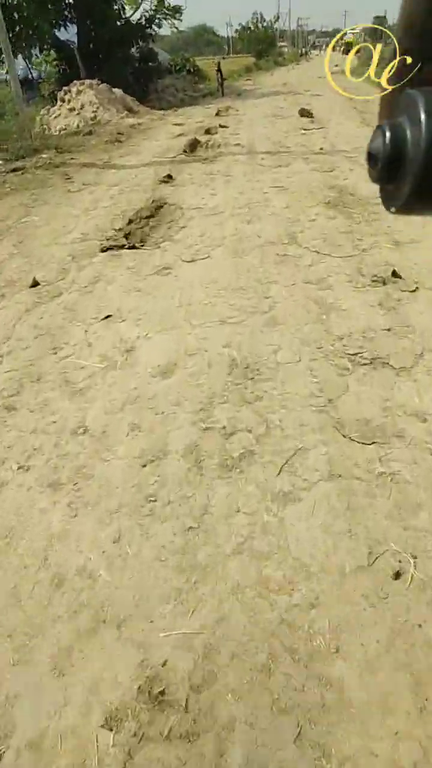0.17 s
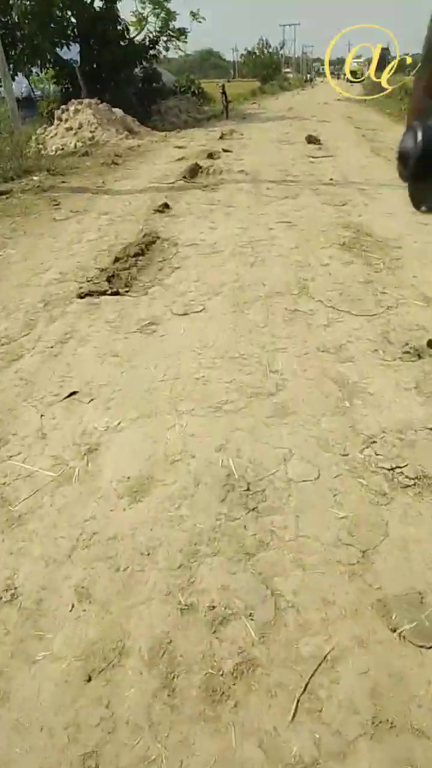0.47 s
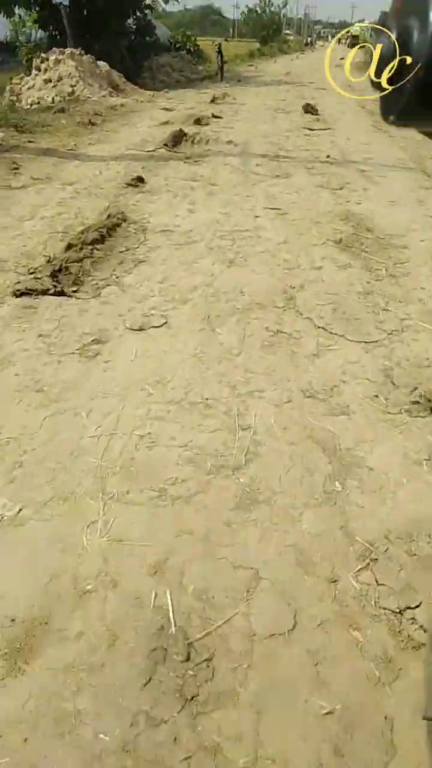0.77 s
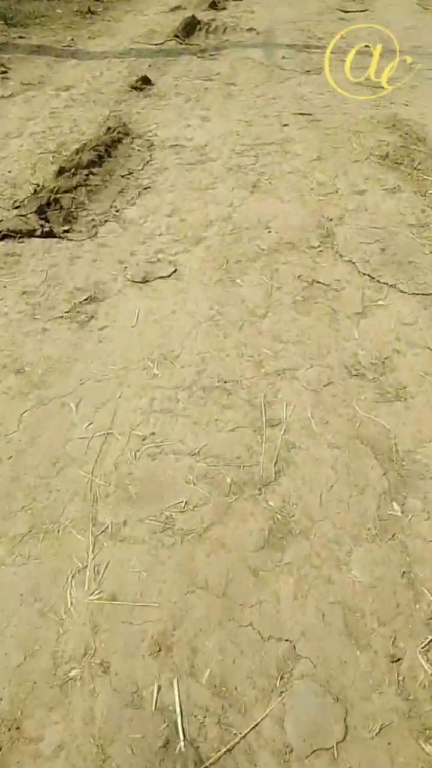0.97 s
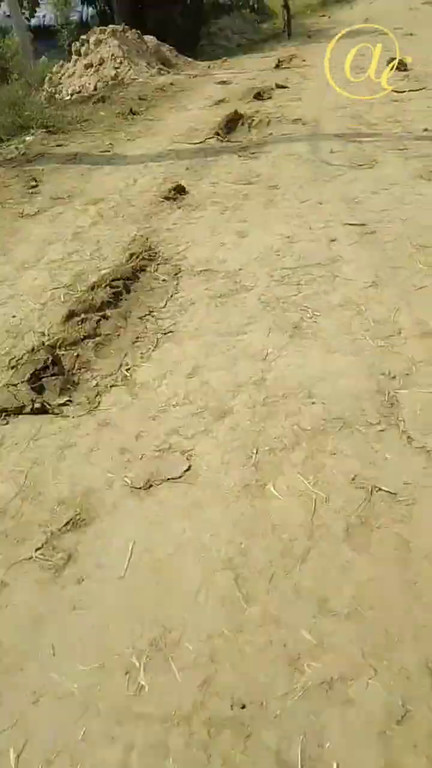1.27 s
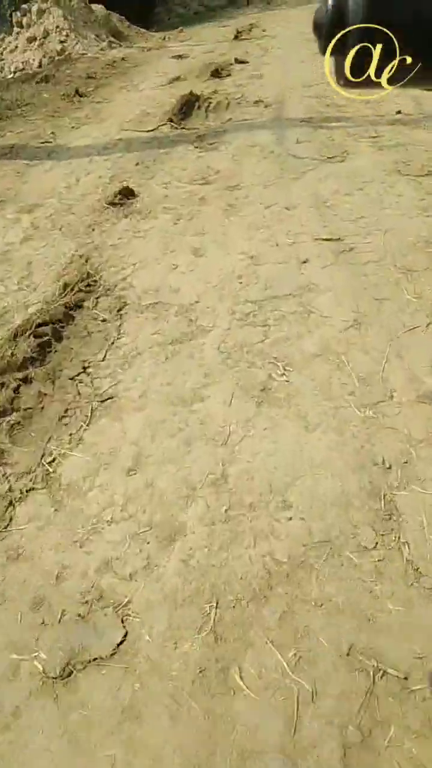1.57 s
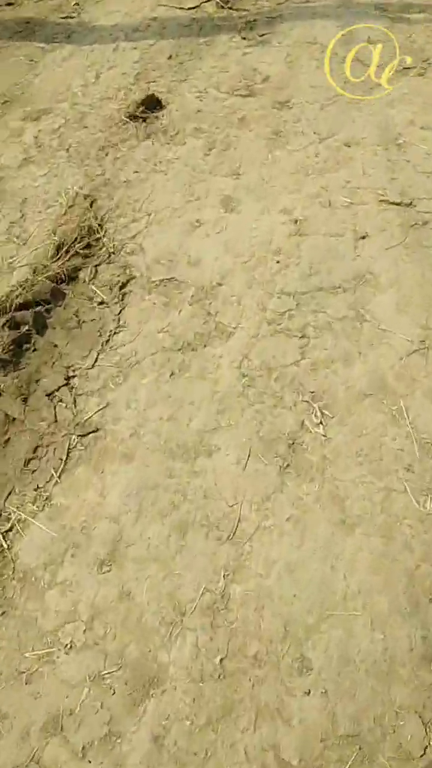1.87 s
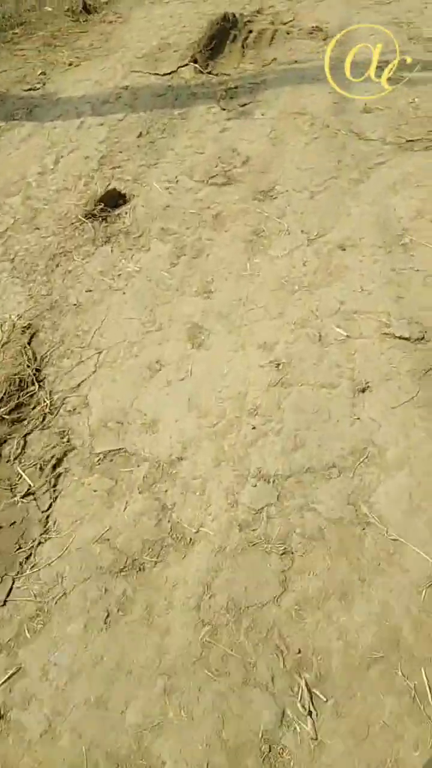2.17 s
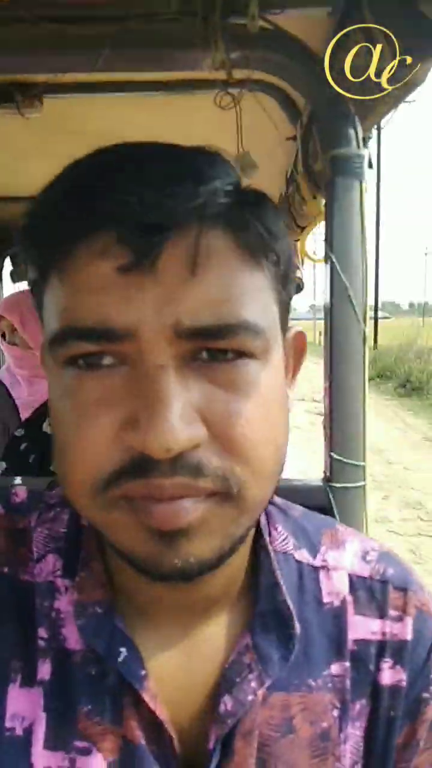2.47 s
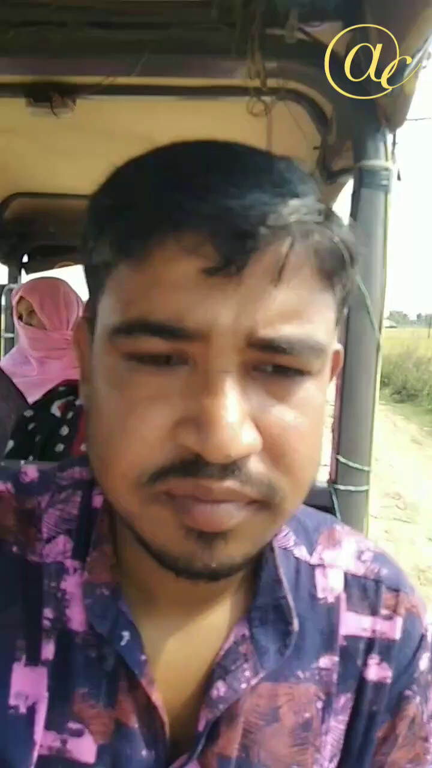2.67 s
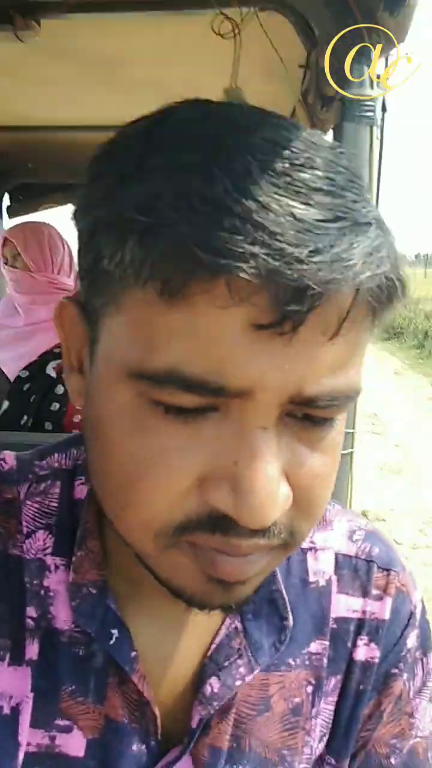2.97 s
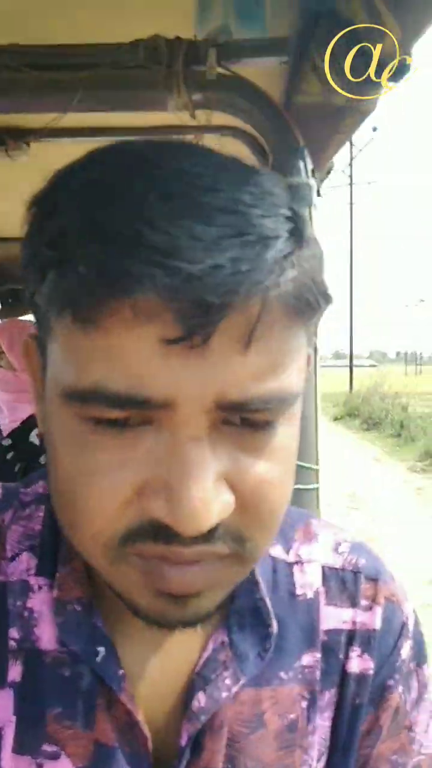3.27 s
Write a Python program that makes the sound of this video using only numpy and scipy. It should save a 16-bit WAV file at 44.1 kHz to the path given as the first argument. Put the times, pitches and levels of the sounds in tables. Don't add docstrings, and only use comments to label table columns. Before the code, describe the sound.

A light three-wheeled vehicle jolts over dry rutted mud, heard by a handheld phone aboard. A bright rattle and low boom open it; then uneven knocks, jingling metal, tiny squeaks and tyre crunch continue, busiest around 1.2-1.7 s. Sound cuts out from about 2.03 to 2.28 s, with a faint blip at the end. It returns with a strong, duller rattle, denser cabin knocks and deep heaving thumps until about 3.4 s.

```python
import sys
import numpy as np
from scipy import signal
from scipy.fft import rfft, irfft
from scipy.io import wavfile

SR = 44100
rng = np.random.default_rng(int(sys.argv[2]) if len(sys.argv) > 2 else 0)


def to_linear_factor(level_db):
    exponent = np.asarray(level_db, float) / 20
    return 10 ** exponent


def unload_wav(signal):
    wavfile.write(
        sys.argv[1],
        SR,
        np.round(np.clip(np.atleast_2d(signal).T, -1, 1) * 32767).astype(np.int16),
    )


N = 149940
MUTE_S, UNMUTE_S = 2.0334, 2.2774

# start in seconds, peak level in dB,
# brightness in dB per octave.
RATTLES_ROAD = [(0.0044, -31, -4), (0.12, -44, -7), (0.16, -43.5, 0), (0.2094, -43, 13), (0.2446, -31, -1),
                (0.3953, -30.5, 6), (0.4239, -33, -4), (0.4698, -36.5, 5), (0.5686, -38, -2),
                (0.6046, -36, 8), (0.6194, -34.5, 7), (0.6337, -31.5, -5), (0.667, -32, 3),
                (0.9433, -39.5, 4), (1.071, -33, -8), (1.2623, -27, -1), (1.3089, -39, 14),
                (1.478, -26, -1.5), (1.4944, -39.5, -4), (1.5409, -38, 8), (1.89, -40, 2), (1.927, -37, 0),
                (1.9734, -41.5, 7.5), (2.0017, -38, 12), (2.0114, -40, 15.5), (2.0204, -32, 12.5)]
# start in seconds, peak level in dB.
RATTLES_CABIN = [(2.279, -18), (2.329, -40), (2.415, -17.5), (2.4604, -39), (2.572, -43), (2.6703, -36.5),
                 (2.6804, -23.5), (2.743, -42), (2.863, -38), (2.9387, -24.5), (3.0109, -31), (3.068, -30),
                 (3.1818, -21.5), (3.3036, -37), (3.3587, -30.5)]


def rms_one(x):
    return x / np.sqrt(np.mean(x ** 2) + 1e-20)


def in_time(parts):
    seconds, values = np.concatenate(parts).T
    return np.interp(np.arange(N) / SR, seconds, values)


def drift(rate_hz):
    r = np.exp(-80 * np.pi * rate_hz / SR)
    noise = rng.standard_normal(N // 40 + 2002)
    slow = signal.lfilter([1], [1, -2 * r, r * r], noise)[2000:]
    return np.interp(np.arange(N) / 40, np.arange(len(slow)), rms_one(slow))


def resonate(x, hz, width_hz):
    r = np.exp(-np.pi * width_hz / SR)
    poles = [1, -2 * r * np.cos(2 * np.pi * hz / SR), r * r]
    return signal.lfilter([(1 - r * r) / 2, 0, (r * r - 1) / 2], poles, x + 1e-18)


def add(out, s, x):
    i = max(int(s * SR), 0)
    out[i:i + len(x)] += x[:N - i]


def blow(rise_s, t60):
    t = np.arange(SR // 2) / SR
    return (1 - np.exp(-t / rise_s)) * to_linear_factor(-60 * t / max(t60, .01))


def gritty(per_s, share):
    size = to_linear_factor(4 * np.minimum(rng.exponential(1, N), 3))
    clicks = (rng.random(N) < per_s / SR) * size * rng.choice([-1, 1], N)
    share = np.clip(share, 0, 1)
    return np.sqrt(share) * rms_one(clicks) + np.sqrt(1 - share) * rng.standard_normal(N)


def bands(x, road, cabin):
    hz = np.arange(1, N // 2 + 2) * SR / N

    def coloured(curve):
        curve_hz, curve_db = np.array(curve).T
        return rfft(x) * to_linear_factor(np.interp(np.log(hz), np.log(curve_hz), curve_db, left=-70))

    before, after = coloured(road), coloured(cabin)
    facing_road = np.arange(N) < MUTE_S * SR
    for centre in 62.5 * 2 ** np.arange(0, 8.6, .5):
        share = np.cos(np.pi * np.clip(np.log2(hz / centre), -.5, .5)) ** 2
        yield centre, np.where(facing_road, irfft(before * share, N), irfft(after * share, N))


def halves(x, low_hz, high_hz):
    band_pass = signal.butter(2, [low_hz, high_hz], "band", fs=SR, output="sos")
    y = signal.sosfilt(band_pass, x)
    cut = int(MUTE_S * SR)
    return np.where(np.arange(N) < cut, 1 / y[:cut].std(), 1 / y[cut:].std())


def heave():
    # time of the ridge in seconds, peak level in dB.
    ridges = [(0.19, -33), (0.261, -31.5), (0.569, -33), (0.807, -38), (0.999, -30), (1.199, -39),
              (1.397, -31), (1.52, -29), (1.649, -36), (1.999, -34), (2.557, -24.5), (2.849, -32),
              (2.919, -26), (2.978, -26.5), (3.071, -35), (3.151, -29.5), (3.267, -31.5)]
    swing_hz, width_hz, bed_db = 28.5, 30, -47
    rise_s, t60_s, lead_s = 0.028, 0.31, 0.019
    settle_s = 0.27
    out, t = np.zeros(N), np.arange(SR // 2) / SR
    for (s, db), (spread, sign) in zip(ridges, rng.uniform(-0.81, 1, (len(ridges), 2))):
        swing = np.sin(2 * np.pi * swing_hz * (1 + 0.54 * spread) * t) * np.sign(sign)
        add(out, s - lead_s, to_linear_factor(db + 8.5) * blow(rise_s, t60_s) * swing)
    bed = resonate(resonate(rng.standard_normal(N), swing_hz, width_hz), swing_hz, 2 * width_hz)
    settling = np.clip(np.abs(np.arange(N) / SR - UNMUTE_S) / settle_s, .3, 1)
    return out + to_linear_factor(bed_db) * rms_one(bed) * settling


def booms():
    # start in seconds, peak level in dB, pitch in Hz.
    floor_pan = [(0.009, -26, 130), (0.147, -41, 174), (0.396, -36.5, 145), (0.682, -30, 145.4),
                 (0.996, -31.5, 140), (1.278, -28.5, 134), (1.338, -30.5, 165), (1.509, -27.5, 132.3),
                 (1.565, -27, 153), (1.657, -20.5, 143.5), (1.961, -29, 140), (2.299, -32, 140),
                 (2.443, -27.5, 130.6), (2.568, -28.5, 139), (2.881, -23.5, 138.7), (3.188, -27.5, 140),
                 (3.273, -26, 127.4)]
    # start in seconds, peak level in dB, pitch in Hz.
    seat_frame = [
        (0.419, -39, 205),
        (1.05, -36.5, 192),
        (1.311, -28, 208),
        (1.575, -27, 216.3),
        (1.954, -31, 201.2),
        (2.52, -29, 197.7),
    ]
    rise_s, t60_s, trim_db = 0.018, 0.21, 1.56
    sag, sag_s = 0.16, 0.036
    hum_hz, hum_width_hz, hum_db = 140, 43, -45.5
    out, t = np.zeros(N), np.arange(SR // 2) / SR
    turns = t + sag * (sag_s * (1 - np.exp(-t / sag_s)) - .5 * t)
    for s, db, hz in floor_pan + seat_frame:
        add(out, s - .004, to_linear_factor(db + trim_db) * blow(rise_s, t60_s) * np.sin(2 * np.pi * hz * turns))
    hum = resonate(resonate(rng.standard_normal(N), hum_hz, hum_width_hz), hum_hz, 2 * hum_width_hz)
    return out + to_linear_factor(hum_db) * rms_one(hum)


def knocks():
    # start in seconds, peak level in dB,
    # pitch in Hz, T60 in seconds.
    frame_knocks = [(0.163, -35.5, 1175, 0.11), (0.242, -38, 810, 0.45), (0.515, -30.5, 607, 0.041),
                    (.596, -44, 850, 0.11), (0.619, -29, 764, 0.22), (.683, -33.5, 1540, 0.11),
                    (.818, -39, 550, .08), (0.865, -32, 1390, 0.054), (0.944, -29, 883, 0.11),
                    (1.028, -31.5, 750, 0.12), (1.06, -31.5, 1170, 0.36), (1.202, -29, 1167, 0.21),
                    (1.302, -32, 1080, .15), (1.339, -33.5, 1070, 0.16), (1.398, -34.5, 1160, 0.28),
                    (1.453, -30, 670, 0.25), (1.478, -24, 1360, 0.14), (1.506, -23.5, 1120, 0.03),
                    (1.542, -29.5, 369, 0.45), (1.59, -35.5, 1320, 0.1), (1.634, -35.5, 640, 0.13),
                    (1.792, -33, 696, .1), (1.894, -25, 776, 0.11), (1.918, -33.5, 625, 0.09),
                    (1.993, -32.5, 750, 0.15),
                    (2.281, -29.5, 1460, 0.24), (2.346, -33, 900, 0.059), (2.4045, -28, 1150, 0.12),
                    (2.417, -18.5, 2450, 0.078), (2.4574, -28, 1050, 0.085), (2.4882, -31.5, 1190, .1),
                    (2.553, -25, 817, 0.3), (2.568, -28.5, 1980, 0.16), (2.572, -34, 1090, 0.16),
                    (2.621, -31.5, 900, .1), (2.668, -28, 1640, 0.11), (2.685, -27, 1240, 0.15),
                    (2.7143, -32.5, 910, 0.11), (2.715, -26.5, 2450, 0.061), (2.743, -29.5, 2460, 0.06),
                    (2.7886, -25, 1622, 0.24), (2.801, -32, 2500, 0.16), (2.824, -30, 2050, .15),
                    (2.854, -27.5, 610, 0.11), (2.929, -27.5, 1040, .1), (2.985, -26.5, 740, 0.41),
                    (2.884, -28.5, 2200, 0.17), (3.07, -30, 1134, 0.082), (3.077, -31, 1920, 0.17),
                    (3.1535, -33.5, 990, 0.086), (3.184, -22.5, 2140, 0.045), (3.2543, -28.5, 1150, .07),
                    (3.359, -28.5, 1120, .08), (3.3773, -30.5, 1510, 0.061)]
    # frequency in Hz, level in dB per Hz.
    frame_colour = [(200, -28.5), (350, -5.5), (1200, -0.5), (2700, -10.5), (4000, -26.5), (12000, -58.5)]
    rise_s, burst_db = 0.003, -10
    ring_db, ring_width = -10, .07
    grit = gritty(1500, 0.49)
    body = sum(band for _, band in bands(grit, frame_colour, frame_colour))
    force, rings = np.zeros(N), np.zeros(N)
    for s, db, hz, t60 in frame_knocks:
        add(force, s - .001, to_linear_factor(db + burst_db) * blow(rise_s, t60))
        shake = np.roll(grit, -int(s * SR))[:SR // 4] * blow(0.0007, 0.79 * t60)[:SR // 4]
        ring = resonate(shake, hz, ring_width * hz)
        add(rings, s, to_linear_factor(db + ring_db) * 2 * ring / np.abs(ring).max())
    return force * rms_one(body) + rings


def rattles():
    # frequency in Hz, level in dB per Hz.
    road_colour = [(1200, -13.5), (2000, -30.5), (3840, 5.5), (4700, -3.5), (5400, 1.5), (8100, 7),
                   (9600, -5.5), (15500, 0)]
    cabin_colour = [(600, -27.5), (1000, 2), (2400, -1), (3800, -15), (5400, -2), (7500, -5.5),
                    (9200, -17.5), (15500, -18.5)]
    # pitch in Hz, level in dB, T60 in seconds.
    roof_bars = [
        (2450, -4, .1),
        (5500, -10, .1),
        (6700, 4.5, .1),
        (7420, -8.5, .15),
    ]
    level_db, rise_s, t60_s, colour_spread_db = -12.5, 0.00053, 0.059, 3
    tail_s, tail_db = 0.18, -10.5
    bars_db, bars_road_db, bars_spread_db = -39.5, -5.5, 3.5
    rows = list(RATTLES_ROAD) + [(s, db, 0) for s, db in RATTLES_CABIN]
    grit = gritty(2500, 0.39) * to_linear_factor(1.2 * drift(180))
    parts = list(bands(grit, road_colour, cabin_colour))
    colour = rng.standard_normal((len(rows), len(parts)))
    strike = rng.standard_normal((len(rows), len(roof_bars)))
    even = halves(sum(band for _, band in parts), 3000, 15000)
    out, force = np.zeros(N), np.zeros((len(roof_bars), N))
    snap = blow(rise_s, t60_s)[:SR // 4]
    shape = snap + to_linear_factor(tail_db) * blow(0.0013, tail_s)[:SR // 4]
    for (s, db, tilt_db), own, hits in zip(rows, colour, strike):
        i = int(s * SR)
        burst = 0
        for (hz, band), c in zip(parts, own):
            gain = to_linear_factor(colour_spread_db * c + tilt_db * np.log2(hz / 7000))
            burst = burst + gain * band[i:i + len(shape)]
        add(out, s, to_linear_factor(db) * burst * shape[:len(burst)])
        for bar, hit in zip(force, hits):
            add(bar, s, to_linear_factor(db + bars_spread_db * hit + bars_road_db * (s < MUTE_S)) * snap)
    ringing = 0
    for bar, (hz, db, t60) in zip(force, roof_bars):
        ringing = ringing + to_linear_factor(db) * resonate(bar * grit, hz, 5.2 / t60) * np.sqrt(t60 * SR)
    return to_linear_factor(level_db) * even * out + to_linear_factor(bars_db) * ringing


def jingles():
    level_db, t60_s = -22, .035
    rows = list(RATTLES_ROAD) + list(RATTLES_CABIN)
    out, t = np.zeros(N), np.arange(SR // 2) / SR
    for row, draws in zip(rows, rng.random((len(rows), 4, 3))):
        in_cabin = row[0] > MUTE_S
        for pitch, late, size in draws:
            hz = 2000 * (4.2 if in_cabin else 7) ** pitch
            ring = blow(.002, t60_s) * np.sin(2 * np.pi * hz * t)
            add(out, row[0] + .015 * late, to_linear_factor(row[1] + level_db + 10 * size - 6 * pitch * in_cabin) * ring)
    return out


def ticks():
    # start in seconds, peak level in dB, centre in Hz.
    contacts = [(0.685, -39, 5030), (.818, -45, 5000), (.866, -43, 5500), (.96, -38, 7200),
                (2.3299, -26.5, 2400), (2.4574, -33, 2700), (2.6694, -36, 2200), (2.744, -38, 4000),
                (3.122, -50, 5140), (3.281, -38.5, 6030), (3.359, -28.5, 7000)]
    t60_s, width = 0.019, 0.55
    out, shape = np.zeros(N), blow(.0004, t60_s)[:SR // 16]
    for (s, db, hz), noise in zip(contacts, rng.standard_normal((len(contacts), len(shape)))):
        x = resonate(resonate(noise * shape, hz, width * hz), hz, width * hz)
        add(out, s, to_linear_factor(db) * x / np.abs(x).max())
    return out


def squeaks():
    # start in seconds, length in seconds, pitch in Hz, level in dB.
    rubs = [(0.173, 0.014, 7200, -46), (0.538, .03, 10070, -53.5), (0.611, 0.03, 5400, -50),
            (1.48, .025, 5330, -42), (1.482, 0.019, 8400, -47), (3.3, 0.017, 4400, -53),
            (2.0, 0.017, 9560, -45.5), (0.629, 0.012, 10490, -47), (0.666, .02, 13100, -48),
            (1.066, .015, 7470, -50.5), (1.668, 0.017, 6430, -47.5), (1.673, 0.011, 4130, -50),
            (1.676, 0.1, 4000, -58), (1.778, 0.0085, 7200, -40.5), (3.075, 0.027, 7110, -46),
            (3.2, 0.019, 6500, -58), (3.297, 0.03, 6600, -52),]
    width = .02
    out = np.zeros(N)
    for s, length, hz, db in rubs:
        noise = rng.standard_normal(SR // 8)
        x = resonate(resonate(noise, hz, width * hz), hz, width * hz)[1000:]
        progress = np.arange(len(x)) / SR / max(length, .003)
        add(out, s, to_linear_factor(db) * rms_one(x) * np.sin(np.pi * np.clip(progress, 0, 1)))
    return out


def roll():
    # time in seconds, level in dB.
    loudness = [
        [(0, -41), (.35, -40), (.45, -45), (.58, -41.5), (.8, -43), (1.05, -41.5), (1.6, -40.5), (1.75, -44.5),
         (2.03, -42.5)],
        [(2.28, -40), (2.39, -42.5), (2.55, -40), (2.8, -38.5), (3.1, -39), (3.4, -41.5)],
    ]
    # frequency in Hz, level in dB per Hz.
    road_colour = [(60, -1.5), (140, -3.5), (460, -12), (1140, -11.5), (2400, -21.5), (5000, -37),
                   (11000, -40.5), (15800, -33.5)]
    cabin_colour = [(60, 0), (140, -1.5), (1250, -8.5), (2500, -14), (4500, -27), (7000, -24.5),
                    (10000, -42), (15800, -40.5)]
    # resonance in Hz, width in Hz, lift as a gain.
    ports = [
        (4000, 430, 1.1),
        (7200, 1160, 3.1),
    ]
    trim_db, patchy_db = -2.5, 1.3
    taps_per_s, tap_t60_s, tap_db, tap_colour_db = 200, .018, -8, 7
    fast = drift(25)
    taps = np.flatnonzero(rng.random(N) < taps_per_s / SR)
    size = np.minimum(rng.exponential(1, len(taps)), 2)
    fall = to_linear_factor(-60 / (tap_t60_s * SR))
    colour, bed = np.zeros(len(taps)), 0
    for _, band in bands(gritty(1500, 0.18), road_colour, cabin_colour):
        colour = .5 * colour + .85 * rng.standard_normal(len(taps))
        kicks = np.zeros(N)
        kicks[taps] = size * to_linear_factor(tap_db + tap_colour_db * np.clip(colour, -3, 1.5))
        flutter = to_linear_factor(patchy_db * (fast + drift(18)))
        bed = bed + band * flutter * (1 + signal.lfilter([1], [1, -fall], kicks + 1e-18))
    lifted = sum(lift * resonate(bed, hz, width_hz) for hz, width_hz, lift in ports)
    bed = bed + (np.arange(N) < MUTE_S * SR) * lifted
    return to_linear_factor(in_time(loudness) + trim_db) * bed * halves(bed, 490, 2000)


def scene():
    return (heave() + booms() + knocks() + rattles() + squeaks() + roll() + jingles() + ticks())[None]


def top_cut(x):
    return signal.sosfilt(signal.butter(12, 16910, fs=SR, output="sos"), x)


def record(dry):
    cutoff_hz, cabin_offset = 15950, .0043
    blip_s, blip_db = 2.2715, -17
    t = np.arange(N) / SR
    x = irfft(rfft(dry) * (np.arange(N // 2 + 1) * SR / N < cutoff_hz), N)
    x = x + cabin_offset * np.clip((t - UNMUTE_S) / .3, 0, 1)
    closing = np.clip((MUTE_S - t) / 0.00058, 0, 1)
    blip = to_linear_factor(blip_db) * (t >= blip_s) * (t < UNMUTE_S)
    gate = closing + (t >= UNMUTE_S) + blip
    return top_cut(x * gate)


dry = scene()
out = record(dry)
unload_wav(out)
```